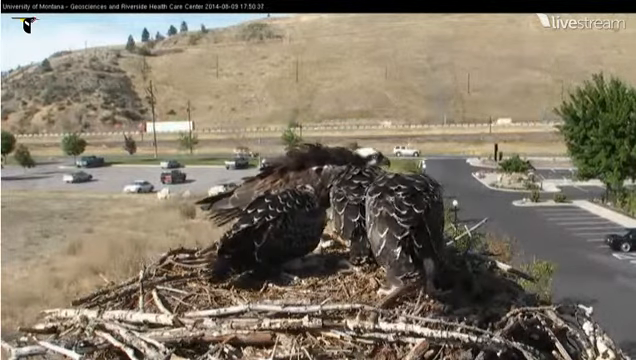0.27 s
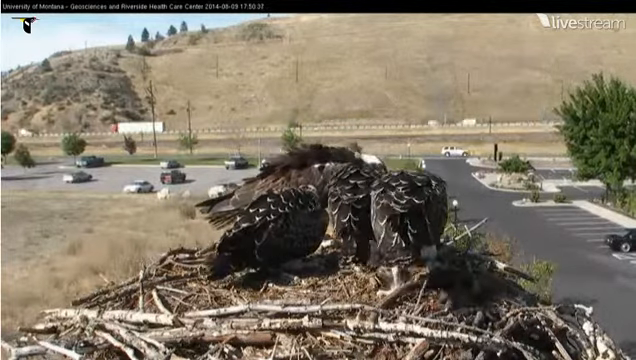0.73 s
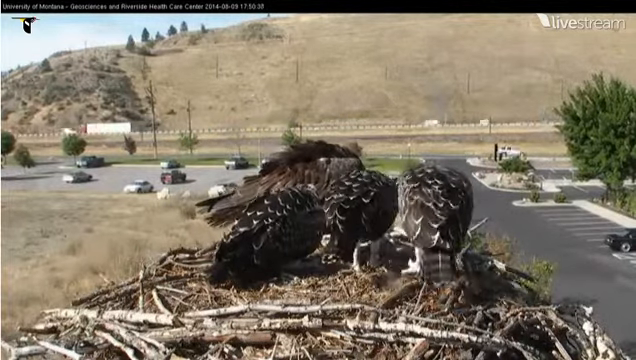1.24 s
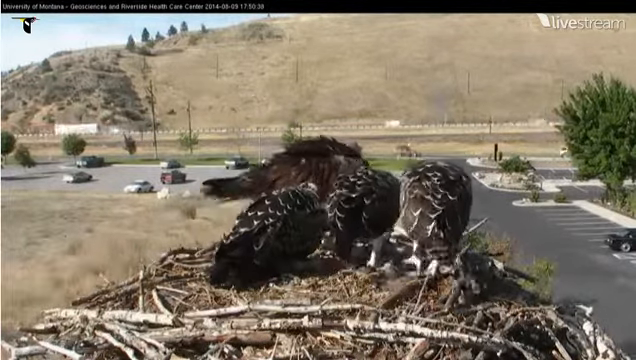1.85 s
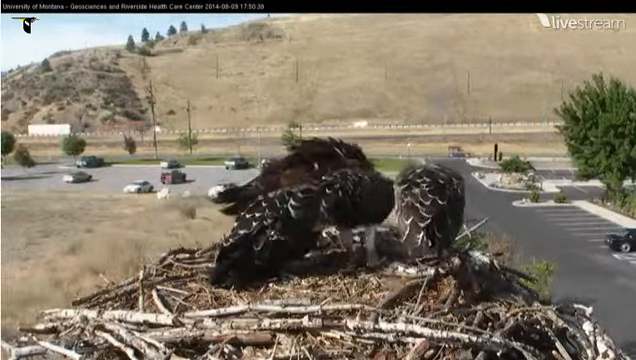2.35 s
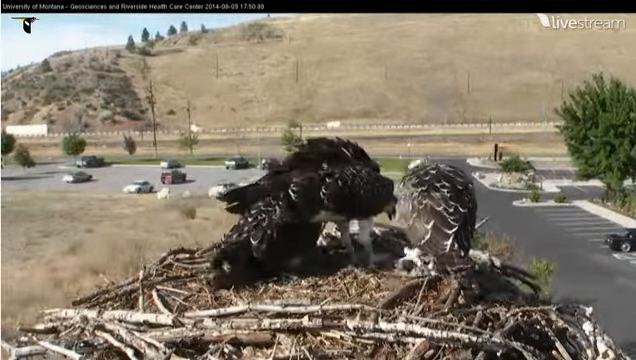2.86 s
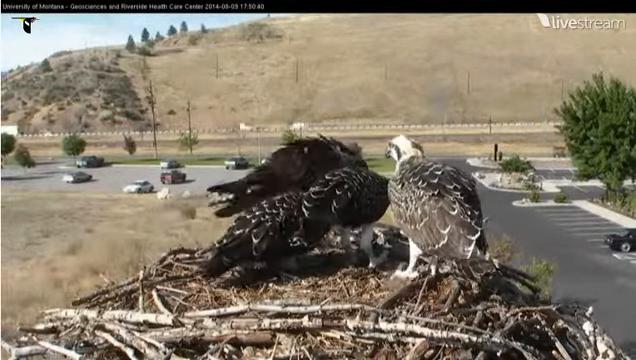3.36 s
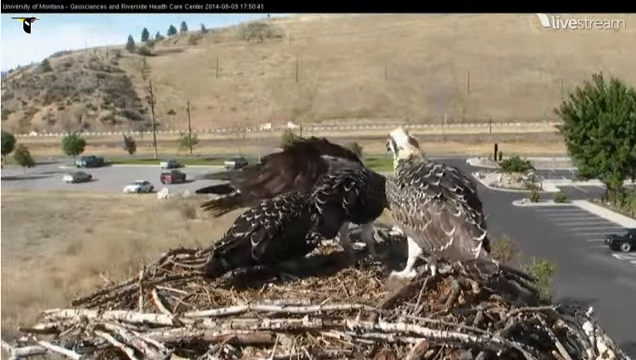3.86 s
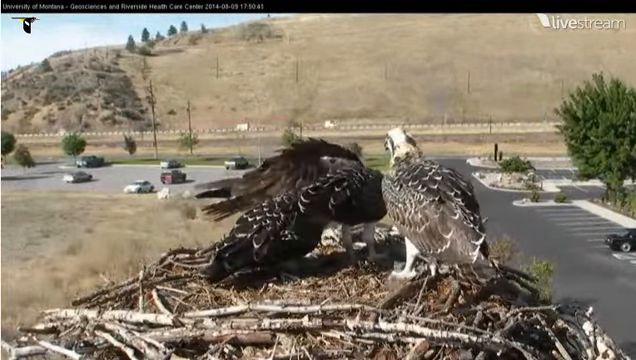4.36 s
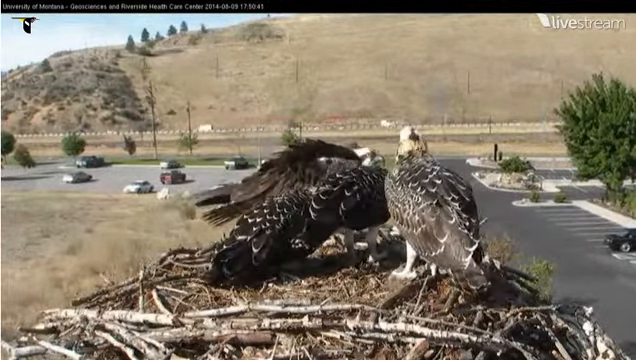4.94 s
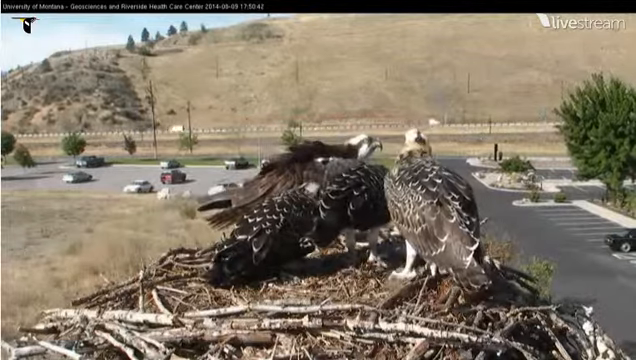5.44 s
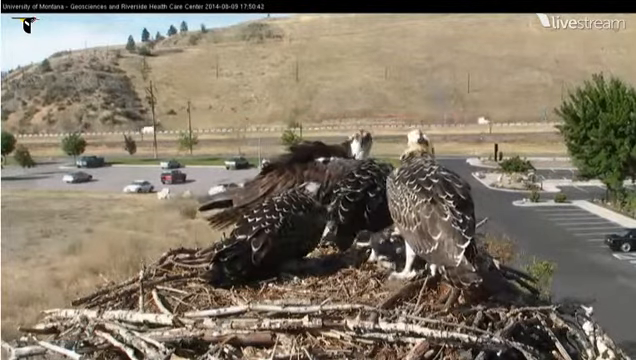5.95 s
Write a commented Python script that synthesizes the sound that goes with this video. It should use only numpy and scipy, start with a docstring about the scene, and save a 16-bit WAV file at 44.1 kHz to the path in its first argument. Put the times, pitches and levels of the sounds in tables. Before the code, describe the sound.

Several young ospreys scream for food on an open-air nest, close to a camera microphone. Piercing, slightly raspy whistles scoop up, dip, climb and drop, overlapping, with short yelps, chirps and thin higher squeals between. They grow louder and denser in the second half. A tight slap echo doubles everything, and loud peaks distort. Far traffic rushes evenly beneath a faint electrical hum.

```python
"""On a nest, close under a camera microphone, young ospreys beg with screams that overlap one another.
Each scream is a near-pure, slightly raspy whistle: scoop, hump, dip, climb and drop, built as a gliding
sine with harmonics and noise; yelps, squeals and chirps lie between. Below are road noise as coloured
noise, tyre whines as wavering sines, and mains hum. The camera's feed carries all of these twice,
68 ms apart, overloads on the peaks and crackles."""
import sys
import numpy as np
from scipy import signal
from scipy.fft import rfft, irfft
from scipy.io import wavfile
from scipy.ndimage import uniform_filter1d, minimum_filter1d

SR = 44100
rng = np.random.default_rng(int(sys.argv[2]) if len(sys.argv) > 2 else 0)


def store_wav(level_fs):
    """Save 16-bit WAV to argv[1]."""
    pcm = np.round(np.clip(np.atleast_2d(level_fs), -1, 1) * 32767)
    wavfile.write(sys.argv[1], SR, pcm.T.astype(np.int16))


N = 273840
TIME = np.arange(N) / SR  # s


def undb(db):
    """Logarithmic level: decibels to amplitude gain."""
    return 10 ** (np.asarray(db) / 20)


def coloured(points):
    """Spectral shaping: white noise weighted by (Hz, dB) points on a log frequency axis, scaled to rms 1."""
    hz, db = np.transpose(points)
    bins = np.maximum(np.fft.rfftfreq(N, 1 / SR), 1)
    weights = undb(np.interp(np.log(bins), np.log(hz), db))
    noise = irfft(rfft(rng.standard_normal(N)) * weights, N)
    return noise / noise.std()


def waver(size, rate_hz):
    """Band-limited random modulation: low-passed noise of spread 1, mostly slower than rate_hz."""
    chance = rng.standard_normal(max(size, SR // 2))
    low_pass = signal.butter(2, min(rate_hz, SR / 4), fs=SR, output="sos")
    drift = signal.sosfilt(low_pass, chance)
    return drift[:size] / drift.std()


def progress(t, start, end):
    """Linear interpolation: 0 before start, 1 after end, a straight line between."""
    return np.clip((t - start) / (end - start), 0, 1)


def moments(start, end, count=256):
    """Uniform sampling: evenly spaced times through a note."""
    return np.linspace(start, end, count)


def slide(s, length_s, hz, db, hz_per_s, db_per_s):
    """Linear glide: a contour (s, Hz, dB) sinks and fades away from time s; negative length leads up to s."""
    t = np.sort(moments(s, s + length_s))
    distance = np.abs(t - s)
    return t, hz - hz_per_s * distance, db - db_per_s * distance


# the low register lies BREAK_HZ under the note it joins
BREAK_HZ, SLIDE_HZ_PER_S, SLIDE_FADE_DB_PER_S = 752.5, 20600, 602.5
SCOOP_S, DROP_S, BREAK_GAP_S = .016, 0.013, .003


def low_register(start, end, first_hz, last_hz, scoop_db, drop_db):
    """Register break: the voice scoops up into a call and drops out of it across a jump in pitch."""
    if scoop_db is not None:
        yield slide(start - BREAK_GAP_S, -SCOOP_S, first_hz - BREAK_HZ, scoop_db,
                    SLIDE_HZ_PER_S, SLIDE_FADE_DB_PER_S)
    if drop_db is not None:
        yield slide(end + BREAK_GAP_S, DROP_S, last_hz - BREAK_HZ, drop_db,
                    SLIDE_HZ_PER_S, SLIDE_FADE_DB_PER_S)


# the hump comes HUMP_S after the start, the crest FALL_S before the end
HUMP_S, FALL_S = 0.02813, .038
# the voice is softer as it enters, and ends under the crest
ENTRY_FADE_DB, FALL_HZ, FALL_FADE_DB = 4.5, 249.4, 4
# Screams of one common shape. Each row: start and end in seconds, entry depth under the hump in Hz
# (negative: from above), hump, dip and crest in Hz, dip in seconds after the start, bow of the climb
# (0 straight, positive early), hump, dip and crest levels in dB, overtone and rasp levels in dB against
# the fundamental, scoop and drop levels in dB (None: absent).
SCREAM_SHAPES = [(-0.079, 0.156, 130, 3300, 3295, 3397, 0.075, 0.25, -50.0, -35, -21, -20, -10.5, None, -20),
                 (-0.0005, 0.3066, 235, 3115, 2840, 3144, 0.08, 0.1, -19.5, -36.5, -16.5, -21, -26, None, None),
                 (0.3, 0.483, 80, 3347, 3170, 3320, 0.069, 0.79, -26.5, -37, -29.0, -18.5, -19, -19, -23),
                 (0.59, 0.8843, 248, 3040, 2703, 3104, 0.075, 0.24, -23, -29, -22, -18.5, -25, None, None),
                 (0.631, 0.944, 187, 3284, 3162, 3386, 0.09, 0.15, -26, -20.9, -15.1, -26.5, -22.5, -29, -27),
                 (1.1547, 1.452, 58.5, 2882, 2900, 3127, 0.087, 0.25, -25.5, -25, -20, -18.5, -15.5, None, -30),
                 (1.164, 1.425, 168, 3183, 3090, 3423, 0.085, 0.17, -25.1, -26, -17, -32, -27, None, -19.5),
                 (1.921, 2.102, 77, 3360, 3150, 3310, 0.066, -0.12, -17.5, -22, -23.5, -24, -21, -21.5, -23.5),
                 (2.027, 2.3334, 181, 2777, 2730, 3190, 0.079, -0.16, -18.5, -15.5, -19.0, -24.5, -30, None, None),
                 (2.239, 2.396, 86, 3330, 3176, 3283, 0.073, 0.4, -18.5, -27, -17, -27.5, -19, -18, -22.5),
                 (2.629, 2.9566, 176, 2812, 2828, 3088, 0.08, 0.1, -28.5, -27.5, -23, -12, -27, None, None),
                 (3.253, 3.439, 205, 3192, 3030, 3139, 0.077, 0.11, -24.5, -30.5, -25, -11.5, -36, -41, None),
                 (3.5543, 3.722, 120, 3200, 3025, 3127, 0.06, 0.34, -26.5, -33.5, -26, -6.5, -38, -33, -47),
                 (3.8377, 4.0613, 140, 3336, 3064, 3302, 0.074, 0.92, -12, -17.5, -14, -28, -27.5, -16.5, -24.5),
                 (3.878, 4.222, 18.5, 2560, 2637, 2985, 0.065, 1.02, -32.0, -28, -13, -26, -32, None, None),
                 (4.186, 4.3978, 99, 3460, 3210, 3370, 0.072, 1.06, -11, -15.5, -11.6, -29, -17.5, -14, -23.5),
                 (4.4397, 4.753, -190, 2645, 2750, 3155, 0.072, -0.094, -16.0, -15.5, -13, -27, -32, None, -18.5),
                 (4.532, 4.7618, 94, 3404, 3166, 3365, 0.079, 0.68, -10, -15.5, -10, -27, -19, -19, -23),
                 (4.8961, 5.1275, 190, 3308, 3080, 3267, 0.083, 1.23, -11.0, -15.5, -11, -24.5, -23.5, -21.5, None),
                 (5.073, 5.44, 222, 2957, 2740, 3281, 0.072, 0.45, -17.5, -20.5, -10.5, -28.5, -48, None, None),
                 (5.251, 5.5422, 151, 3323, 3035, 3310, 0.067, -0.01, -11.5, -14.5, -14.5, -26.5, -23, -15.5, -19),
                 (5.6255, 5.9642, 399, 3237, 2870, 3389, 0.08, 0.1, -18.5, -21, -14.5, -35.5, -33.5, None, None),
                 (5.681, 6.016, 132.5, 3385, 3120, 3336, 0.069, 0.89, -18.5, -17.5, -17.5, -26.5, -13, -17.5, -20),
                 (6.1756, 6.4, 288, 3290, 3170, 3350, 0.08, 0.3, -12.5, -20.0, -20.0, -24, -16, -18.5, None)]


def screams():
    """Coupled frequency and amplitude modulation: pitch and level go through hump, dip, climb and fall."""
    for (start, end, entry_hz, hump_hz, dip_hz, crest_hz, dip_s, bow,
         hump_db, dip_db, crest_db, overtone_db, rasp_db, scoop_db, drop_db) in SCREAM_SHAPES:
        t = moments(start, end)
        entry = (1 - progress(t, start, start + HUMP_S)) ** 2
        hump = np.cos(np.pi / 2 * progress(t, start + HUMP_S, start + dip_s)) ** 2
        climb = progress(t, start + dip_s, end - FALL_S)
        climb = climb + bow * climb * (1 - climb)
        fall = progress(t, end - FALL_S, end) ** 2.515
        hz = dip_hz + (hump_hz - dip_hz) * hump + (crest_hz - dip_hz) * climb
        hz = hz - entry_hz * entry - FALL_HZ * fall
        db = dip_db + (hump_db - dip_db) * hump + (crest_db - dip_db) * climb
        db = db - ENTRY_FADE_DB * entry - FALL_FADE_DB * fall
        frame = low_register(start, end, hump_hz, crest_hz, scoop_db, drop_db)
        for contour in [(t, hz, db), *frame]:
            yield overtone_db, rasp_db, contour


YELP_SAG_HZ, YELP_FADE_DB = 234, 6.5
YELP_OVERTONE_DB, YELP_RASP_DB = -30, -17
# Screams cut short after the hump. Each row: start and end in seconds, peak in Hz, place of the peak
# from 0 to 1, level at the peak in dB, scoop and drop levels in dB (None: absent).
YELP_ARCHES = [ (1.554, 1.621, 3444, .25, -18, -16, -16), (1.713, 1.775, 3444, 0.41, -16, None, -22.5),
               (2.531, 2.636, 3290, .45, -15, -35, None)]


def yelps():
    """Parabolic glide: a single arch of pitch, loudest at its peak."""
    for start, end, hz, peak, db, scoop_db, drop_db in YELP_ARCHES:
        t = moments(start, end)
        sag = ((progress(t, start, end) - peak) / (1 - peak)) ** 2
        arch = t, hz - YELP_SAG_HZ * sag, db - YELP_FADE_DB * sag
        for contour in [arch, *low_register(start, end, hz, hz, scoop_db, drop_db)]:
            yield YELP_OVERTONE_DB, YELP_RASP_DB, contour


SQUEAL_SETTLE_S, SQUEAL_SWING_S, SQUEAL_SAG_S = 0.083, 0.145, 0.0088
SQUEAL_SWELL_S, SQUEAL_SWELL_DB = .03, 6.5
TUMBLE_S, TUMBLE_HZ_PER_S, TUMBLE_FADE_DB_PER_S = 0.026, 15000, 339
SQUEAL_OVERTONE_DB, SQUEAL_RASP_DB = -27, -12
# Squeals in the top register. Each row: start and end in seconds, onset, held pitch and closing sag
# in Hz, level after the swell in dB, first pitch of the tumble in Hz, its first level in dB.
SQUEAL_FLIPS = [ (0.85, .943, 3860, 3985, 95, -27.5, 2630, -28),
                (1.102, 1.152, 3960, 3930, 450, -31.5, 2840, -36),
                (2.301, 2.42, 3915, 3980, 130, -21.5, 3010, -20.5),
                (2.638, 2.673, 3940, 3840, 170, -16, 2930, -17.5),
                (2.836, 3.078, 4410, 4268, 11, -24, 3383, -15.5),
                (4.416, 4.442, 3725, 3680, 160, -15.5, 2930, -25)]


def squeals():
    """Damped oscillation: the top register swells, swings onto its pitch, sags and breaks into a tumble."""
    for start, end, onset_hz, held_hz, sag_hz, db, tumble_hz, tumble_db in SQUEAL_FLIPS:
        t = moments(start, end)
        age = t - start
        swing = np.cos(2 * np.pi * age / SQUEAL_SWING_S) * np.exp(-(age / SQUEAL_SETTLE_S) ** 2)
        sag = sag_hz * np.exp((t - end) / SQUEAL_SAG_S)
        hz = held_hz + (onset_hz - held_hz) * swing - sag
        swell = db - SQUEAL_SWELL_DB * np.exp(-age / SQUEAL_SWELL_S)
        tumble = slide(end + BREAK_GAP_S, TUMBLE_S, tumble_hz, tumble_db,
                       TUMBLE_HZ_PER_S, TUMBLE_FADE_DB_PER_S)
        for contour in [(t, hz, swell), tumble]:
            yield SQUEAL_OVERTONE_DB, SQUEAL_RASP_DB, contour


CHIRP_FADE_DB, CHIRP_OVERTONE_DB, CHIRP_RASP_DB = 3, -30, -18
# Short chirps and flicks. Each row: start and end in seconds, first, middle and last pitch in Hz,
# level at the middle in dB.
CHIRP_BENDS = [ (.15, .21, 2155, 2580, 2300, -28), (.328, .422, 2250, 2497, 2350, -29),
               (.552, .63, 2280, 2550, 2330, -30.5), (.785, .87, 2284, 2500, 2330, -29),
               (.995, 1.067, 2290, 2490, 2400, -27.5), (1.09, 1.106, 2515, 2894, 3040, -23),
               (1.624, 1.71, 2700, 2880, 2970, -22), (2.608, 2.634, 2863, 3020, 3120, -19),
               (2.811, 2.827, 2410, 2630, 2770, -21), (4.387, 4.41, 2680, 2810, 2970, -14.5),
               (4.91, 4.958, 2210, 2200, 2400, -20), (5.103, 5.13, 2180, 2190, 2060, -24.5),
               (5.936, 5.952, 3410, 3970, 4050, -35), (6.195, 6.208, 4040, 4140, 4100, -30)]


def chirps():
    """Quadratic chirp: one smooth bend of pitch through three points, softer at both ends."""
    for start, end, first_hz, middle_hz, last_hz, db in CHIRP_BENDS:
        t = moments(start, end)
        u = 2 * progress(t, start, end) - 1  # -1 to 1 through the note
        slope = (last_hz - first_hz) / 2
        curve = (first_hz + last_hz) / 2 - middle_hz
        hz = middle_hz + slope * u + curve * u ** 2
        yield CHIRP_OVERTONE_DB, CHIRP_RASP_DB, (t, hz, db - CHIRP_FADE_DB * u ** 2)


EDGE_S = .0025  # fade at both ends of a note
STRAINED_ABOVE_HZ = 3550  # mean pitch that counts as the top register
SECOND_TONE_HZ = 4030  # a weak second tone of the syrinx that mixes with the harmonics
# Harmonics 2 to 5 of the syrinx. Each entry: level in dB against the note's overtone level.
HARMONICS_DB = [1.5, -24, -35, -46]


def whistle(overtone_db, rasp_db, contour, air, hiss):
    """Harmonic synthesis of one register: a trembling sine, harmonics, sum tones and rasp, with its indices."""
    s, hz, db = contour
    at = np.flatnonzero((TIME > s[0] - EDGE_S) & (TIME < s[-1] + EDGE_S))
    t = TIME[at]
    pitch = np.interp(t, s, hz)
    edges = np.clip(np.minimum(t - t[0], t[-1] - t) / EDGE_S, 0, 1)
    effort = undb(np.interp(t, s, db)) * np.sin(np.pi / 2 * edges)
    # the top register is strained: it trembles more and hisses
    strain = float(hz.mean() > STRAINED_ABOVE_HZ)
    tremble = (0.023 + 0.18 * strain) * waver(len(t), rate_hz=56)  # radians
    effort = effort * (1 + (.06 + .14 * strain) * waver(len(t), rate_hz=140))
    phase = 2 * np.pi * np.cumsum(pitch) / SR + tremble
    overtones = sum(undb(d) * np.sin(k * phase) for k, d in enumerate(HARMONICS_DB, 2))
    # the second tone adds thin sum tones above the first three harmonics
    second = 2 * np.pi * SECOND_TONE_HZ * t + .3 * waver(len(t), rate_hz=60)
    overtones = overtones + undb(-26) * np.sin(second + 2 * phase)
    overtones = overtones + undb(-42) * np.sin(second + 3 * phase)
    sum_tone = undb(-43) * np.sin(second + phase)
    # the overtones flutter in strength
    upper = undb(overtone_db) * overtones * (1 + 0.17 * waver(len(t), rate_hz=61))
    rasp = undb(rasp_db) * air[at] + strain * undb(-17) * hiss[at]
    tone = np.sqrt(2) * (np.sin(phase) + upper + sum_tone)
    return at, effort * (tone + rasp)


# Colour of the rasp in the throat. Each row: frequency in Hz, relative level in dB.
THROAT_COLOUR = [(1800, -31), (2500, 6), (3200, 10), (3800, -1.5), (4700, -21), (5700, -11), (6600, -14.5),
                 (7600, -16.5), (8600, -31), (10000, -37.5), (12000, -49.5), (15000, -53)]


def birds():
    """Superposition: all notes add up, sharing one throat noise; registers meet at the breaks."""
    out, air = np.zeros(N), coloured(THROAT_COLOUR)
    hiss = coloured([(2000, -25), (3200, 15.0), (4800, -10.0), (6000, -4.5), (7000, -1),
                     (8200, -8), (9300, -49.5), (12000, -25.5), (15000, -44)])
    for overtone_db, rasp_db, contour in [*screams(), *yelps(), *squeals(), *chirps()]:
        at, sound = whistle(overtone_db, rasp_db, contour, air, hiss)
        out[at] += sound
    return out


ROAD_DB = -34.5  # rms, before the slow swell
# Spectrum of the distant road. Each row: frequency in Hz, relative level in dB per Hz.
ROAD_COLOUR = [(20, -1.5), (45, -5), (100, -4), (180, -2), (300, 0.5), (550, 3.5), (900, 1), (1600, -1.5),
               (2400, -0.5), (4000, -13), (6000, -28.5), (9000, -36), (12000, -52.5), (16000, -60.5)]


def road():
    """Broadband noise: far traffic is an even rush that swells a little midway."""
    swell_db = np.interp(TIME, [0, 3.5, 6.2], [-.8, .8, -.6])
    level_db = ROAD_DB + swell_db + 0.57 * waver(N, rate_hz=4.3)
    return coloured(ROAD_COLOUR) * undb(level_db)


# Faint tyre whines from the highway. Each row: middle in seconds, length in seconds, pitch in Hz,
# rms level at the middle in dB.
WHINE_NOTES = [(1.501, 0.54, 1486, -47), (2.47, 0.13, 880, -41), (2.876, 0.2, 869, -47),
               (5.589, 0.23, 573, -43)]


def tyre_whines():
    """Phase modulation: passing tyres sing briefly on a wavering note under a bell-shaped envelope."""
    out = np.zeros(N)
    for middle_s, length_s, hz, db in WHINE_NOTES:
        swell = np.exp(-(2 * (TIME - middle_s) / length_s) ** 2)
        tone = np.sin(2 * np.pi * hz * TIME + waver(N, rate_hz=17))
        out += np.sqrt(2) * undb(db) * swell * tone
    return out


# Partials of the mains hum. Each row: frequency in Hz, rms level in dB before the common hum gain.
HUM_PARTIALS = [(120, -47.5), (240, -49.5)]


def hum(hum_db):
    """Additive synthesis: mains hum on the microphone line is a sum of steady sines."""
    partials = sum(np.sqrt(2) * undb(db) * np.sin(2 * np.pi * hz * TIME) for hz, db in HUM_PARTIALS)
    return undb(hum_db) * partials


def scene():
    """Linear mixing: the birds over the road, the tyre whines and the hum."""
    return (birds() + road() + tyre_whines() + hum(hum_db=1.0))[None]


# Crackles of the feed. Each row: start in seconds, level at the onset in dB before the common gain.
CRACKLE_TICKS = [(5.46, -27), (5.4811, -25.5), (5.5628, -29), (5.5716, -27), (5.5864, -31), (5.9339, -43)]


def crackles(crackle_db, decay_s):
    """Exponential decay: brief bursts of broadband noise, strongest around the screams' own pitch."""
    ticks = sum(undb(db) * (TIME >= s) * np.exp(-np.abs(TIME - s) / decay_s) for s, db in CRACKLE_TICKS)
    noise = coloured([(1000, -14.5), (2400, 10), (3300, 18.5), (4500, 2.5),
                      (6000, -13), (10000, -16.0), (15000, -35)])
    return undb(crackle_db) * ticks * noise


DOUBLING_S = 2999 / 44100  # delay of the second copy
TOP_HZ = 15800  # upper limit of the feed


def record(dry):
    """Comb interference and overload: a late copy beats with gliding whistles; limit, clip, crackle, cut the top."""
    late = np.pad(dry, ((0, 0), (round(DOUBLING_S * SR), 0)), mode="reflect")[:, :N]
    feed = dry + 0.96 * late
    # a fast limiter holds the loudest beats just over full scale, so only their tips clip
    ceiling = 1.13
    needed_gain = ceiling / np.maximum(np.abs(feed), ceiling)
    gain = uniform_filter1d(minimum_filter1d(needed_gain, size=60), size=60)
    feed = np.clip(feed * gain, -1, 1) + crackles(crackle_db=10.5, decay_s=0.0031)
    return signal.sosfilt(signal.ellip(8, .2, 70, TOP_HZ, fs=SR, output="sos"), feed)


dry = scene()
out = record(dry)
store_wav(out)
```